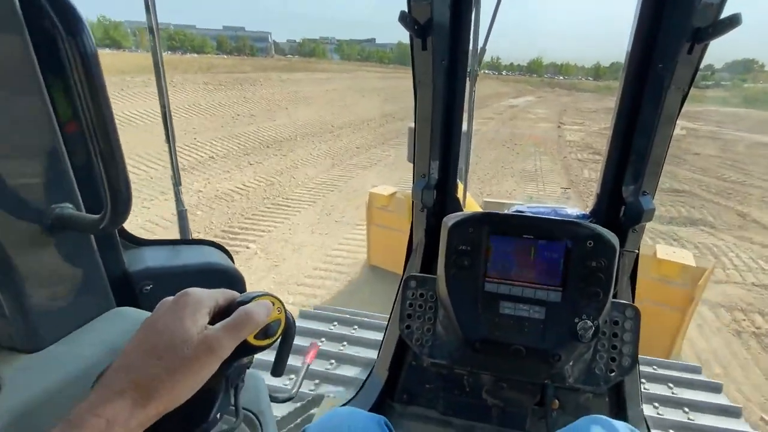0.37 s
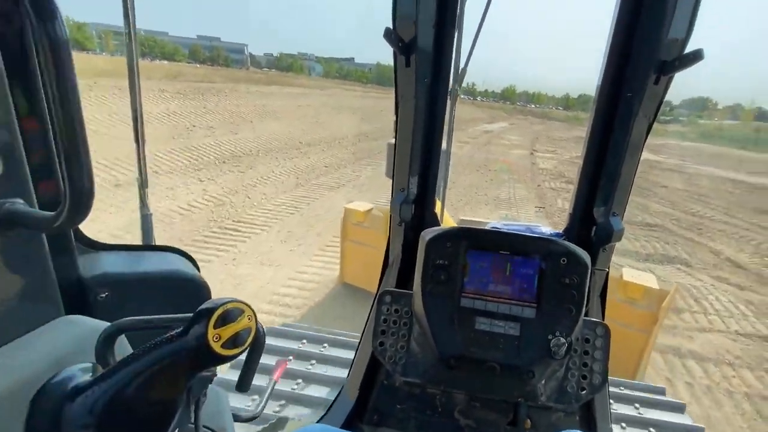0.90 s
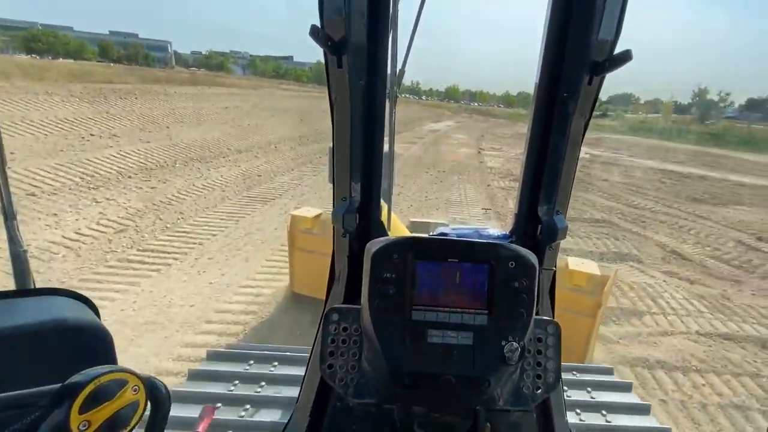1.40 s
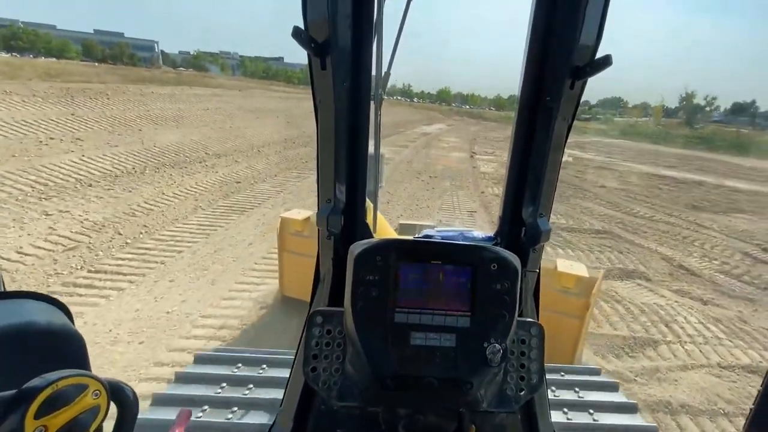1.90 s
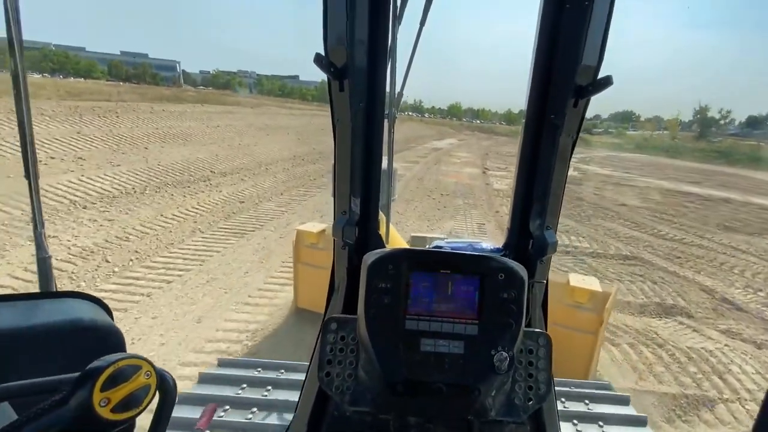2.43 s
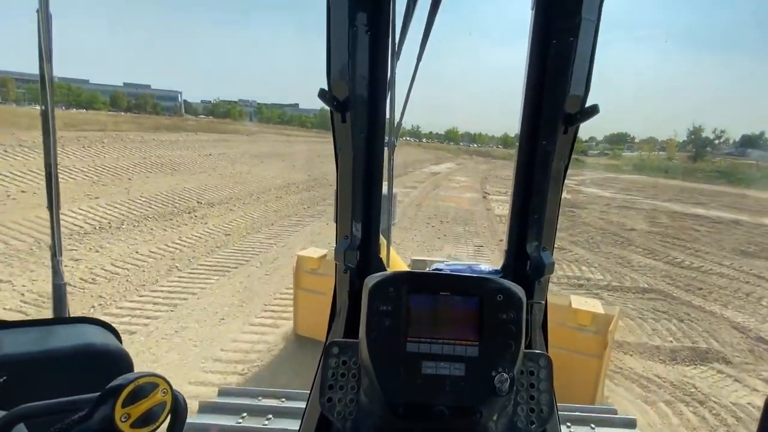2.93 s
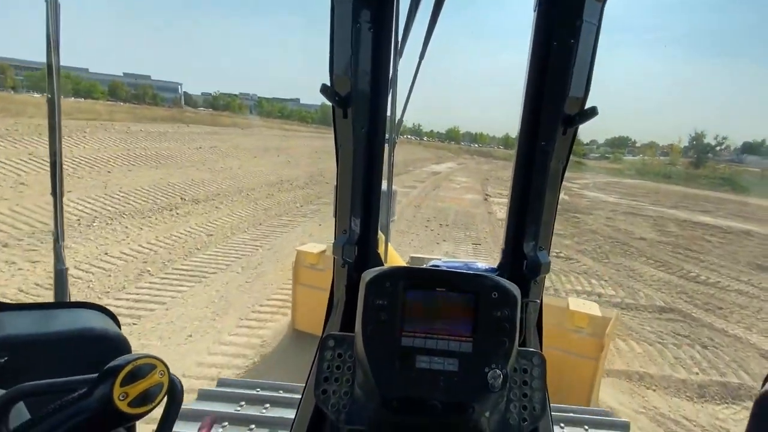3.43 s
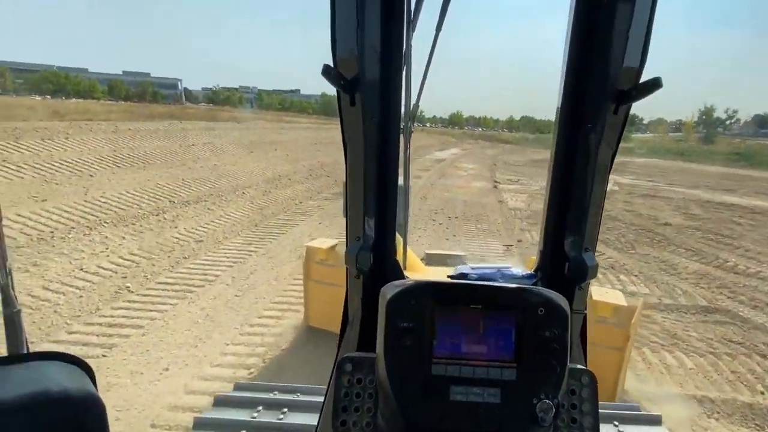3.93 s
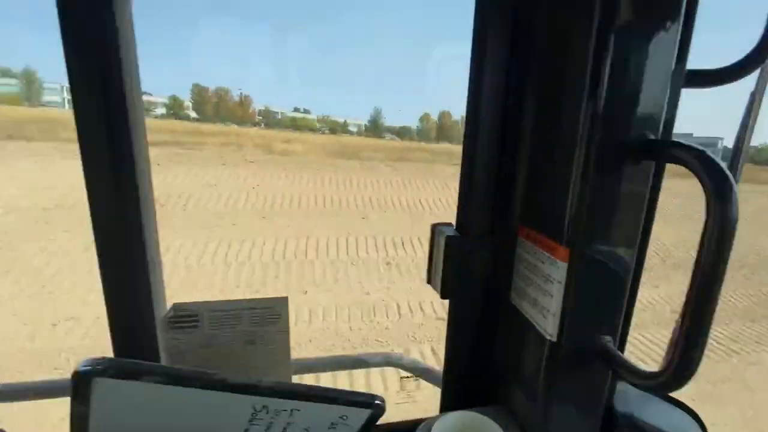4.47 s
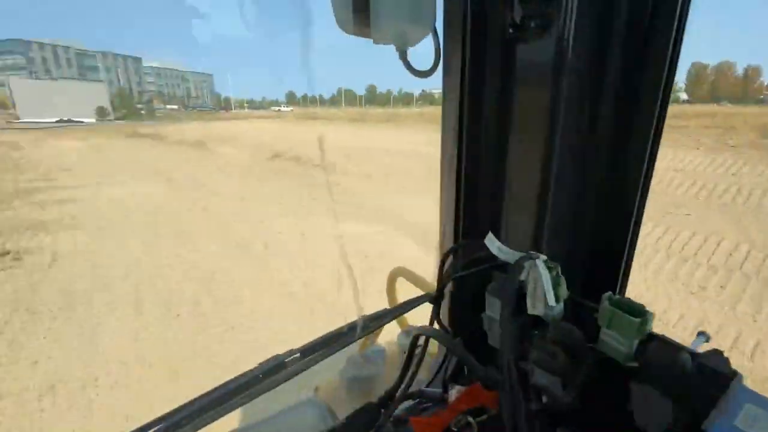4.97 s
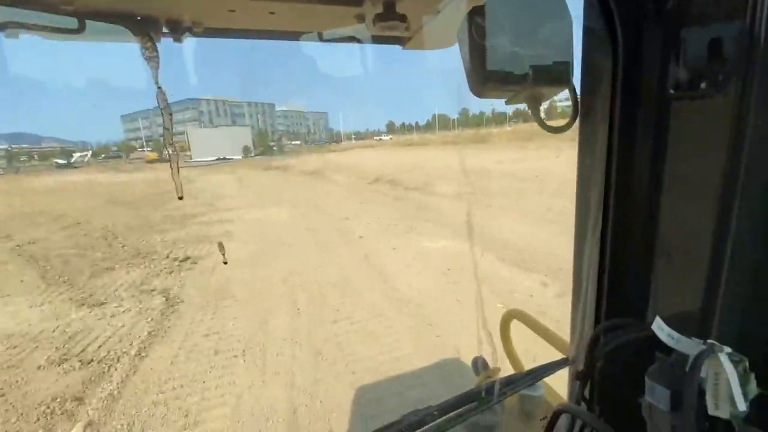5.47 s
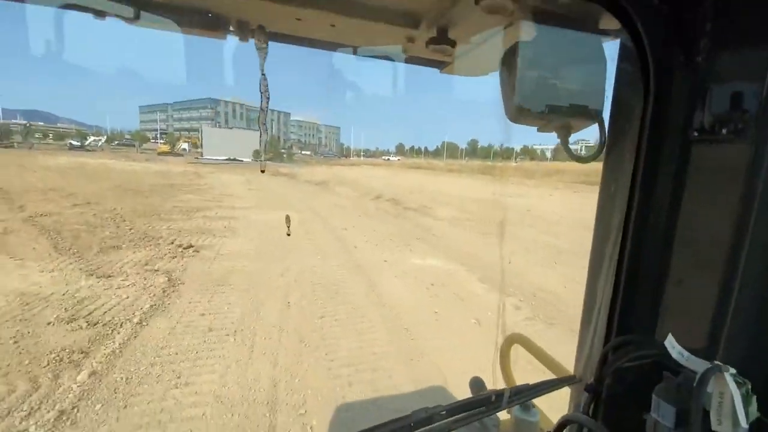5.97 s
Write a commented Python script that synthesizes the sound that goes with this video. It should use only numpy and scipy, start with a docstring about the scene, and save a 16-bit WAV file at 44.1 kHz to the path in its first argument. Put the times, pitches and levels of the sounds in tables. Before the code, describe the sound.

Close stereo sound at the operator's head inside a closed bulldozer cab. A diesel engine drones low under a broad muffled roar, with wavering pump whine and deep irregular booms. Tracks tick and clatter lightly. Around four seconds a cluster of knocks and a sharp metallic snap arrive as the head turns to the rear window; then the roar grows louder and boomier.

```python
"""Riding in a bulldozer cab

Inside the closed cab of a diesel bulldozer on its tracks, heard by two ports on the driver's head.
Engine and pump tones are wavering sines in a roar of shaped noise; the deep booms of the shaken cab are
resonating noise that swells and fades. Clatter and knocks are noise bursts, a loose fitting snaps, a turbo
whistles faintly. Late on the head turns round to the rear window, where the booms add up."""
import sys
import numpy as np
from scipy import signal
from scipy.fft import rfft, irfft, next_fast_len
from scipy.io import wavfile
from scipy.ndimage import uniform_filter1d

SR = 44100
rng = np.random.default_rng(int(sys.argv[2]) if len(sys.argv) > 2 else 0)


def transcribe(signal):
    """Save signal, clipped to [-1, 1], as a 16-bit WAV file at the path in sys.argv[1]."""
    frames = np.atleast_2d(signal).T
    limited = np.clip(frames, -1, 1)
    pcm = np.round(limited * 32767).astype(np.int16)
    wavfile.write(sys.argv[1], SR, pcm)


def voltage_ratio(decibels):
    """Convert decibels (scalar or array-like) to amplitude ratios, 20 dB per decade."""
    exponent = np.asarray(decibels, float) / 20
    return 10 ** exponent


N = 269406  # length in samples
HOP, T = 512, np.arange(N) / SR  # roar step in samples, time in s

# Where the head looks: t/s, turn (0 ahead, 1 behind)
HEAD_TURN = [(0, 0.021), (4.0, 0.026), (4.4, 0.7), (4.8, 0.93), (6.11, 1)]
# How loud the working engine is heard: t/s, roar level/dB
ENGINE_LOAD = [(0, -34.5), (0.8, -33), (1.4, -32.5), (2.2, -31.5), (3.6, -31), (4.2, -30.5), (4.5, -29),
               (5.35, -28), (5.9, -28), (6.11, -29)]
# Colour of the roar facing ahead, then behind: f/Hz, relative level/dB
ROAR_AHEAD = [(30, -4), (60, -12), (100, -10), (170, -17.5), (230, -17.5), (380, -20), (650, -28.5),
              (1000, -26.5), (1150, -33.5), (1400, -34), (2800, -38), (3500, -45), (7000, -53),
              (10000, -62.5), (14300, -64.5), (14700, -93)]
ROAR_BEHIND = [(30, -18), (58, -8), (95, 4), (160, -6.5), (260, -15.5), (400, -15), (540, -16),
               (750, -15.5), (1150, -28), (1400, -26), (2900, -34), (3600, -39), (7000, -47.5),
               (10000, -56), (14300, -59), (14700, -82)]
# Left-right balance of the roar facing ahead, then behind: f/Hz, left over right level/dB
BALANCE_AHEAD = [(60, 3.5), (180, -3), (550, 7), (1650, -0.5), (4970, 3), (15000, -3.5)]
BALANCE_BEHIND = [(60, -4), (180, 1.5), (550, 7), (1650, -0.5), (4970, 4), (15000, -3)]
# Likeness of the roar left and right, ahead then behind: f/Hz, likeness (kept within -1 to 1)
LIKENESS_AHEAD = [(45, 1), (75, 0.75), (150, 0.03), (220, 0.89), (350, 0.65), (420, 0.44), (560, -0.88),
                  (700, -1), (850, -0.23), (1550, -0.38), (2300, -0.099)]
LIKENESS_BEHIND = [(60, 0.72), (170, 0.99), (260, -0.55), (400, 0.26), (650, -0.64), (850, -0.66),
                   (1000, -1.16), (1150, -0.12), (1600, -0.46), (2300, -0.037)]
# Panels and glass that the roar rings: f/Hz, width/Hz, boost ahead/dB, boost behind/dB
PANELS = [(310, 81, 3, 7), (600, 18, 3, 3.5), (730, 82, 1, -7), (1075, 11, -8, 4.5), (1255, 21, 9, 6),
          (1400, 53, 7.5, 3.5), (1907, 88, 4.5, 4), (2220, 140, 2.5, 0), (2700, 51, 2.5, -1.5),
          (3360, 35, -3, -4), (4080, 390, 2, 0.5), (5000, 630, 2, 0.5)]
# Bands of the roar that rise or dip for a while:
# f/Hz, width/Hz, start t/s, end t/s, change/dB (sign flips if the start is after the end)
ROAR_SWELLS = [(295, 140, 4.5, 5.15, -7), (610, 230, 4.5, 5.4, 4), (515, 180, 5.5, 6.3, 2.5),
               (1700, 820, 4.5, 5.2, -2), (945, 110, 0, 1.15, -3.5), (1500, 900, 5.5, 4, 0.5),
               (247, 92, 0.5, 1.2, 1), (1400, 520, 1, 3.1, 1.5), (2580, 900, 3.5, 7.1, 1),
               (1045, 230, 5, 7.2, 4.5), (620, 120, 3.5, 4.4, 3), (170, 50, 4.5, 5.8, 3)]
# Turbo whistle: t/s, f/Hz, level/dB
TURBO_WHISTLE = [(0, 14000, -76), (1.0, 13700, -81), (1.3, 13950, -67), (1.9, 14250, -66),
                 (2.7, 14000, -68), (3.5, 13970, -63), (4.0, 14100, -69), (4.9, 14300, -67),
                 (5.4, 13950, -80), (6.11, 13850, -75)]
# Colour of the clatter of links and rollers: f/Hz, relative level/dB
CLATTER_COLOUR = [(600, -9), (1500, 14.5), (2900, 2), (3600, -1), (7000, -4), (12000, -35), (16000, -40)]
# Knocks of track links and loose gear:
# t/s, relative level/dB, ring f/Hz, brightness/dB per octave, left over right level/dB
KNOCKS = [(0.399, -47.5, 5700, -7, 4), (0.569, -44, 4500, -7, 2), (0.5745, -49, 11300, -3, 0),
          (1.1, -56.5, 1300, -16, 6), (1.1423, -51, 10600, 2, 0), (1.2318, -46, 4030, -10, 1),
          (1.942, -50, 2410, -10, 4), (2.1603, -52, 2780, -9, 7), (2.29, -58, 2330, -6, 1.5),
          (2.45, -46, 4360, -9, 0), (2.78, -48, 1100, -13, 4), (3.121, -56, 1400, -14.5, 14),
          (3.276, -48, 4400, -9, 8), (3.5586, -46, 9200, -4, -3), (3.5878, -41, 7500, -6, 0),
          (3.7678, -48, 2700, -16.5, 5), (3.905, -43, 7200, -9, 1), (3.911, -39.5, 4200, -11, 1),
          (3.9723, -42.5, 4900, -13, 6), (3.973, -42, 3100, -13.5, 8), (4.095, -46, 6740, -7, -1),
          (4.325, -45, 5500, -4, 1), (4.335, -44, 9000, -3, 1), (4.33, -44, 15000, 14, -3),
          (4.346, -39, 14800, 9, -2), (4.344, -42, 11500, 0, 0), (4.346, -40, 1700, -13, 0),
          (4.343, -36.5, 4800, -6, 5), (4.35, -39.5, 2900, -9, 0), (4.6, -47, 1300, -11, -1),
          (4.535, -39, 14800, 10, 0), (4.534, -38.5, 8650, -3, -1), (5.08, -46.5, 2520, -17, 4),
          (5.2012, -43, 3090, -5, 0), (5.37, -46, 5000, -9, -6), (5.382, -47, 6500, 0, 0),
          (5.398, -44, 2200, -9, 11), (5.523, -42, 3060, -18, 0), (6.089, -44, 7000, -10, 3)]
# What every knock rings in the cab frame: f/Hz, width/Hz, boost/dB
FRAME = [(1400, 290, 3.5), (2840, 220, 9), (3060, 150, 6.5), (4040, 210, 7.5), (5160, 1300, 9),
         (7100, 390, 6), (8960, 370, 7)]
# A loose fitting snaps and bounces: t/s, level/dB, pitch ratio
SNAPS = [(4.3435, -30, 0.89), (4.3478, -33, 0.85), (4.5375, -32, 0.77), (5.3873, -24.5, 0.93),
         (5.3908, -28, 0.99)]
# Rings of that fitting: f/Hz, relative level/dB, time to fall by 60 dB/s
FITTING_RINGS = [(1350, 1, 0.013), (1890, -5, 0.011), (3600, 1, 0.0088), (7450, -2, 0.0046)]
# The five boom modes of the cab: f/Hz, width/Hz, left-right likeness ahead, likeness behind,
# left over right level/dB, evenness (0-1)
CAB_MODES = [(43.9, 21, 0.96, 0.96, 1.5, 0.78), (89.6, 12.8, 0.71, 0.99, 0.5, 0.95),
             (138.86, 20.1, 0.11, 0.99, 1, 0.24), (215.2, 41, 0.92, 0.91, 3, 0.98),
             (576, 370, -0.097, 0.46, 0, 0)]
# Each mode between its swells: level ahead/dB, level behind/dB, waver/dB,
# share of the head turn that brings the change (0-1)
RESTING = [(-28.5, -25, 1.4, 0.8), (-35, -28, 4, 1), (-33.5, -28, 1.5, 0.5), (-38.5, -43.5, 2, 1),
           (-42.5, -41, 1.2, 0.5)]
# Loudest swells of the booms: t/s, f/Hz (picks the mode near it), added peak level/dB,
# time to fall by 39 dB/s (at least 0.02)
BOOM_SWELLS = [(0.143, 214, -27.5, 0.039), (0.452, 44, -18, 0.057), (0.538, 137, -21.5, 0.028),
               (1.116, 137, -26.5, 0.13), (1.148, 214, -29.5, 0.071), (1.15, 44, -21.5, 0.18),
               (0.253, 137, -28, 0.11), (3.55, 137, -28.5, 0.12), (1.308, 214, -28, 0.056),
               (1.452, 214, -32, 0.06), (1.49, 44, -19, 0.054), (1.567, 137, -28, 0.266),
               (1.834, 44, -17.5, 0.059), (1.94, 137, -25, 0.14), (2.05, 89, -22, 0.078),
               (2.183, 137, -24.5, 0.042), (2.226, 44, -19, 0.068), (2.268, 137, -20.5, 0.025),
               (2.375, 89, -23.5, 0.082), (2.563, 89, -22, 0.04), (2.832, 44, -16.5, 0.06),
               (2.893, 89, -34, 0.037), (2.97, 89, -21.5, 0.071), (3.096, 89, -22.5, 0.065),
               (3.263, 137, -22.5, 0.05), (3.334, 44, -18, 0.1), (3.505, 89, -19.5, 0.043),
               (3.51, 214, -27.5, 0.048), (3.606, 89, -21, 0.041), (3.7, 44, -22.5, 0.47),
               (3.994, 44, -18.5, 0.19), (4.135, 214, -32, 0.078), (4.408, 137, -28, 0.038),
               (4.496, 137, -21.5, 0.15), (4.573, 44, -19.5, 0.17), (4.62, 214, -32, 0.4),
               (4.846, 137, -17, 0.17), (4.96, 89, -19, 0.063), (4.976, 137, -22, 0.07),
               (4.98, 214, -32, 0.069), (5.081, 137, -14, 0.087), (5.163, 89, -16.5, 0.099),
               (5.31, 44, -21, 0.08), (5.429, 89, -15.5, 0.069), (5.464, 214, -33.5, 0.23),
               (5.659, 137, -11, 0.018), (5.725, 214, -32, 0.083), (5.78, 44, -19.5, 0.26),
               (5.55, 137, -24.5, 0.1), (5.946, 89, -14.5, 0.038), (6.045, 137, -23.5, 0.13),
               (5.935, 214, -34, 0.13)]
# Engine speed: t/s, crank turns per second/Hz
CRANK = [(0, 34.4), (1.0, 34.22), (2.0, 34.54), (4.0, 34.48), (5.0, 34.64), (6.11, 34.5)]
# Firing, pump and gear tones: multiple of the crank speed
MULTIPLES = [2, 4, 7, 9, 12, 14, 15, 24, 27]
# Each of those tones: left and right level ahead/dB, left and right level behind/dB,
# left lead ahead/rad, left lead behind/rad
TONES_HEARD = [(-26, -28.5, -24, -25, 0.05, -0.15), (-40.5, -45.5, -34, -32, -2.26, 0),
               (-43, -61, -47, -45, 0.74, 0), (-54, -44, -62, -65, 0.51, 0),
               (-37, -53, -35, -38, 2.6, -0.3), (-48, -47, -47, -46, -1.4, 0.8),
               (-52, -56, -37.5, -48, -0.3, -0.3), (-59, -46.5, -47, -48, -0.8, -2.8),
               (-63, -63, -59, -56, -1.3, -1.6)]
# A tone rises or dips for a while, or its left lead changes:
# crank multiple, start t/s, end t/s, left change/dB, right change/dB, change of left lead/rad
SHIFTS = [(2, 1.75, 2.5, -3, -4, 0), (2, 1.2, 1.75, 2, 2, 0), (2, 3.7, 4.45, -7, -6, 0),
          (24, 0.25, 0.45, 5, 0, 0), (24, 0.72, 0.95, 5, 0, 0), (15, 4.95, 5.1, -4, -3, 0),
          (24, 1.6, 2.2, -1.5, 0, 0), (15, 4.2, 4.75, -6, 0, 0), (15, 5.52, 5.8, 3.5, 2, 0),
          (15, 5.82, 6.3, -6, -3, 0), (24, 4.5, 4.72, 2, -5, 0), (12, 0.25, 1.5, 1.5, 0, -2),
          (12, 1.5, 2.7, -2.5, 8, 0), (12, 2.7, 3.5, 1, 11, 0), (12, 3.3, 3.75, 1.5, 3, 0),
          (12, 3.75, 4.3, -3.5, -3, 0), (12, 4.4, 4.8, 0, 2, 0), (12, 5.85, 6.3, -6, -5, 0),
          (14, 2.1, 3.75, 0, 5, 0), (14, 2.9, 3.75, 8, 5.5, 0), (15, 4.72, 5.25, 2, 0, 0),
          (15, 5.25, 5.5, -3, -3, 0), (24, 1.6, 4.45, 11.5, 1, 0), (24, 2.25, 3.75, 3, -1, 0),
          (24, 0.95, 1.55, 0, -12, 0), (24, 3.95, 4.5, 1, 4, -0.7), (2, 5.2, 5.35, 2.5, 2.5, 0),
          (2, 5.55, 5.9, 1.5, 1.5, 0), (27, 1.25, 2.3, 12, 7, 0), (27, 3.75, 4.35, 17, 8, 0)]
# Likeness traded between the close ports: f/Hz, likeness (-1 out of step, 1 alike)
PORTS = [(40, 0.25), (62, -0.14), (4500, 0.09), (5700, -0.031), (7000, 0.16), (8500, -0.15), (9500, -0.17),
         (10250, 0.28), (11800, 0.77), (12500, -0.62), (14300, -0.6), (14700, 0.26)]

# Softness of each change made by held(), in s, and phase waver of each engine tone, in rad
SHIFT_EDGE_S, WAVER_RAD = 0.1, 0.55
# Treble against the roar, its lifts facing the side and rear windows, flicker of the roar
TREBLE_DB, SIDE_LIFT_DB, REAR_LIFT_DB, FLICKER_DB = -22.5, 1.5, 0.5, 1.11
# Unevenness of the roar: broad patches and narrow ridges
PATCHES_DB, RIDGES_DB = 1.3, 2.8
# Below WORKING_DB a light load is duller: dB per octave for each missing dB, over one octave from BODY_HZ
DULLING, BODY_HZ, WORKING_DB = 0.41, 400, -34
# Track shoes passing the sprocket: rate, time of one landing, sharpness of the throb,
# its small effect on the roar (dB per octave above BODY_HZ), its depth in the clatter rate (share)
SHOES_PER_S, SHOE_S, SHOE_SHARP, SHOE_DB, SHOE_SHARE = 5.8, 3, 1.5, -0.03, 0.55
FLUTTER_SHARE = 0.24  # a faint flutter of the clatter at three times the crank speed
# Scrape before a knock: growth time in ring cycles, share of the knock level
SCRAPE_CYCLES, SCRAPE_SHARE = 18, 0.68
# Knock: 60 dB fall in s (shorter for parts ringing above SMALL_HZ), ring level and width setting
KNOCK_T60, SMALL_HZ, RING_DB, RING_WIDTH_HZ = 0.14, 7000, 5.5, 190
SNAP_RISE_S = 0.00023


def evened(x):
    """Scales a signal to rms 1."""
    return x / np.sqrt(np.mean(np.abs(x) ** 2) + 1e-20)


def curve(rows, t=T):
    """Reads the columns of a table at times t."""
    s, *columns = np.transpose(rows)
    return [np.interp(t, s, c) for c in columns]


def read(points, hz):
    """Reads a spectrum along a log-frequency axis."""
    f, value = np.transpose(points)
    return np.interp(np.log(hz + 1), np.log(f + 1), value)


def drift(top_hz, t=T, span=20):
    """Slow random wandering of rms 1: sines from top_hz / span up to top_hz."""
    coarse = np.arange(0, t[-1] + .02, .01)
    waves = 0
    for f in np.geomspace(top_hz / span, top_hz, num=20):
        waves = waves + np.sin(2 * np.pi * (f * coarse + rng.random())) / np.sqrt(f)
    return np.interp(t, coarse, evened(waves))


def resonate(x, hz, width):
    """A resonance of gain 1 applied twice, for steep skirts."""
    pole = np.exp((2j * np.pi * hz - np.pi * width) / SR)
    once = signal.lfilter([1 - abs(pole)], [1, -pole], x)
    return 2 * signal.lfilter([1 - abs(pole)], [1, -pole], once).real


def pair(shape, same):
    """Two complex noises that are alike by the share same."""
    a, b, c, d = rng.standard_normal((4, *shape))
    same = np.clip(same, -1, 1)
    first, other = a + 1j * b, c + 1j * d
    return np.array([first, same * first + np.sqrt(1 - same ** 2) * other])


def held(start, end, t=T):
    """Rises to 1 at start and falls back at end, with soft edges."""
    return (np.tanh((t - start) / SHIFT_EDGE_S) - np.tanh((t - end) / SHIFT_EDGE_S)) / 2


def bump(hz, centre, width, power=2):
    """A peak of height 1 that falls to half at half the width on either side."""
    return 1 / (1 + ((hz - centre) / (width / 2)) ** power)


def treble(roar_db, turn):
    """Treble level: it follows the roar and leaks in through the glass the head faces."""
    side = 4 * np.clip(turn * (1 - turn), 0, 1)
    return roar_db + TREBLE_DB + SIDE_LIFT_DB * side + REAR_LIFT_DB * turn


def shoes(t=T):
    """Throb of the landing track shoes, mean 0 and rms 1, wandering a little in time."""
    angle = 2 * np.pi * (SHOES_PER_S * (t - SHOE_S) + 0.083 * drift(1.3, t))
    throb = np.exp(SHOE_SHARP * np.cos(angle))
    return evened(throb - throb.mean())


def roar():
    """Engine, fan and ground noise through the cab walls; colour and width change as the head turns."""
    t, hz = np.arange(N // HOP + 5) * HOP / SR, np.fft.rfftfreq(4 * HOP, 1 / SR)
    rows = hz[:, None]
    turn, = curve(HEAD_TURN, t)
    roar_db, = curve(ENGINE_LOAD, t)

    def blend(ahead, behind):
        """Mixes two spectra by how far the head has turned."""
        return read(ahead, hz)[:, None] * (1 - turn) + read(behind, hz)[:, None] * turn

    patches = uniform_filter1d(rng.standard_normal((len(hz), len(t))), 10, 0)
    patches = evened(uniform_filter1d(patches, 8, 1))
    # the many small cab modes: narrow ridges that shift slowly
    ridges = uniform_filter1d(rng.standard_normal((2, len(hz), len(t))), 2, 1)
    ridges = evened(uniform_filter1d(ridges, 45, 2))
    noise = pair(patches.shape, blend(LIKENESS_AHEAD, LIKENESS_BEHIND))
    left_db = blend(BALANCE_AHEAD, BALANCE_BEHIND) / 2

    rings_db = sum((a + (b - a) * turn) * bump(rows, f, width) for f, width, a, b in PANELS)
    colour = voltage_ratio(blend(ROAR_AHEAD, ROAR_BEHIND) + rings_db)
    band = (hz > 170) & (hz < 2500)  # the level is set in this band
    colour /= np.sqrt((colour[band] ** 2).sum(0))

    octaves_high = np.clip(np.log2((rows + 1) / 2500), 0, 1.7)
    lift_db = treble(roar_db, turn) - roar_db
    change_db = octaves_high * (lift_db - np.mean(lift_db))
    octaves_upper = np.clip(np.log2((rows + 1) / BODY_HZ), 0, 1)
    change_db += octaves_upper * (DULLING * np.minimum(roar_db - WORKING_DB, 0) + SHOE_DB * shoes(t))
    for swell_hz, width, start, end, swell_db in ROAR_SWELLS:
        change_db += swell_db * held(start, end, t) * bump(rows, swell_hz, width, 4)

    uneven_db = PATCHES_DB * patches + RIDGES_DB * ridges
    flicker_db = FLICKER_DB * drift(25, t, span=5)
    noise *= colour * voltage_ratio(np.array([left_db, -left_db]) + uneven_db + roar_db + flicker_db + change_db)
    return voltage_ratio(1.0) * signal.istft(noise, nperseg=4 * HOP, noverlap=3 * HOP)[1][:, :N]


def turbo():
    """A faint whistle, blurred by a shaking pitch and out of step at the two ports."""
    hz, level_db = curve(TURBO_WHISTLE)
    blur_hz = 35 * evened(uniform_filter1d(rng.standard_normal(N), 400))
    angle = 2 * np.pi * np.cumsum(hz + blur_hz + 15 * drift(30)) / SR
    return voltage_ratio(level_db + 2.4 * drift(20)) * np.array([np.cos(angle), np.cos(angle + 1.0)])


def latch():
    """Each snap of the loose fitting rings the same short modes, at its own pitch ratio."""
    t, out = np.arange(1500) / SR, np.zeros(N)
    for s, db, ratio in SNAPS:
        ring = 0
        for hz, mode_db, t60 in FITTING_RINGS:
            ring = ring + voltage_ratio(mode_db - 60 * t / t60) * np.sin(2 * np.pi * hz * ratio * t)
        out[round(s * SR):][:len(t)] += voltage_ratio(db) * ring * (1 - np.exp(-t / SNAP_RISE_S))
    return out * voltage_ratio(np.array([[1.2], [-1.2]]))


def knocks():
    """A burst of tilted noise and a ring of the struck part; a scrape leads in, a faint tail follows."""
    size, lead = 8192, 2048  # samples in all, samples before the contact
    out = np.zeros((2, N + size))
    t, hz = (np.arange(size) - lead) / SR, np.fft.rfftfreq(size, 1 / SR)
    frame_db = sum(gain_db * bump(hz, f, width) for f, width, gain_db in FRAME)
    for s, db, ring_hz, tilt_db, pan_db in KNOCKS:
        common, own = rng.standard_normal(size), rng.standard_normal((2, size))
        thin = 1 / (1 + (0.51 * min(ring_hz, 4500) / (hz + 1)) ** 6)  # small parts give no bass
        tilted = thin * voltage_ratio(tilt_db * np.log2((hz + 1) / 5000))
        struck = voltage_ratio(RING_DB) / (1 + ((hz - ring_hz) / RING_WIDTH_HZ) ** 2)
        colour = (tilted + struck) * voltage_ratio(frame_db) / (1 + (hz / 15800) ** 12)
        burst = irfft(rfft(.5 * common + 2.1 * own) * colour, size)
        treble_size = np.sqrt(np.mean(colour[hz > 3000] ** 2))
        quickness = np.clip(ring_hz / SMALL_HZ, 1, 1.4) ** 2
        fall = voltage_ratio(-60 * t / KNOCK_T60 * quickness) + 0.11 * voltage_ratio(-60 * t / 0.25)
        # deep-ringing parts scrape in more slowly
        scrape = SCRAPE_SHARE * np.exp(np.minimum(t, 0) * ring_hz / SCRAPE_CYCLES)
        shape = np.where(t < 0, scrape, fall)
        at = round(s * SR) - lead
        pan = voltage_ratio(np.array([[pan_db], [-pan_db]]) / 2)
        out[:, at:at + size] += voltage_ratio(db - 8.5) * burst / treble_size * shape * pan
    return out[:, :N]


def clatter():
    """Links and rollers tick at random, most as a shoe lands; each tick is a noise burst, other at each port."""
    size = voltage_ratio(3.1 * np.minimum(rng.exponential(1, N), 3))
    size = size * (rng.random(N) < 40. / SR * (1 + SHOE_SHARE * shoes()))  # about 40 ticks per s
    t = np.arange(3000) / SR
    flutter = 2 * np.pi * 3 * np.cumsum(curve(CRANK)[0]) / SR
    tick_power = voltage_ratio(-120 * t / 0.1) * (1 - np.exp(-t / 0.0011))
    bursts = np.sqrt(np.abs(signal.oaconvolve(size ** 2, tick_power)[:N]))
    noise = rng.standard_normal((2, N)) * bursts * (1 + FLUTTER_SHARE * np.cos(flutter))
    shaped = irfft(rfft(noise) * voltage_ratio(read(CLATTER_COLOUR, np.fft.rfftfreq(N, 1 / SR))), N)
    level = voltage_ratio(treble(curve(ENGINE_LOAD)[0], curve(HEAD_TURN)[0]))
    return level * evened(shaped) * voltage_ratio(np.array([[.8], [-.8]]))


def booms():
    """Shaking, made as noise, rings the modes of the cab; each boom swells and fades."""
    turn, = curve(HEAD_TURN)
    out = np.zeros((2, N))
    for resting, mode in zip(RESTING, CAB_MODES):
        rest_a, rest_b, waver_db, share = resting
        hz, width, ahead, behind, left_db, even = mode
        rest_db = rest_a + (rest_b - rest_a) * np.clip(turn / share, 0, 1)
        power = voltage_ratio(rest_db + waver_db * drift(16)) ** 2
        for s, mode_hz, peak_db, length in BOOM_SWELLS:
            if abs(mode_hz / hz - 1) < .2:
                power += voltage_ratio(2 * peak_db - 78 * np.minimum(((T - s) / max(length, .02)) ** 2, 9))
        ring = resonate(pair((N,), ahead + (behind - ahead) * turn).real, hz, width)
        swing = np.abs(signal.hilbert(ring.mean(0), next_fast_len(N))[:N])
        # smooths the noise's own swing so that the listed swells shape the boom
        smooth = uniform_filter1d(swing, 700) + 0.057 * swing.mean()
        steady = ring / smooth ** np.clip(even, 0, 1)
        pan = voltage_ratio(np.array([[left_db], [-left_db]]) / 2)
        out += np.sqrt(power) * steady / np.std(steady.mean(0)) * pan
    return out


def tones():
    """Near sines on multiples of the crank speed; panels flexing make them waver."""
    speed, = curve(CRANK)
    turn, = curve(HEAD_TURN)
    crank = 2 * np.pi * np.cumsum(speed * (1 + 0.0015 * drift(11.95))) / SR
    out = np.zeros((2, N))
    for multiple, heard in zip(MULTIPLES, TONES_HEARD):
        left_a, right_a, left_b, right_b, lead_a, lead_b = heard
        level_db = np.array([left_a + (left_b - left_a) * turn, right_a + (right_b - right_a) * turn])
        level_db = level_db + 2 * drift(12, span=4)
        lead = lead_a + (lead_b - lead_a) * turn
        for which, start, end, *change_db, swing in SHIFTS:
            if round(which) == multiple:
                level_db += np.outer(change_db, held(start, end))
                lead = lead + swing * held(start, end)
        angle = multiple * crank + 2 * np.pi * rng.random() + WAVER_RAD * drift(8, span=5)
        out += voltage_ratio(level_db) * np.cos([angle, angle - lead])
    return np.sqrt(2) * out  # so that the levels are rms


def scene():
    """Adds all sources as they reach the two ports."""
    return roar() + turbo() + latch() + knocks() + clatter() + booms() + tones()


def low_pass(x):
    """Removes everything above the highest recorded frequency."""
    return signal.sosfilt(signal.butter(12, 16390, fs=SR, output="sos"), x)


def record(dry):
    """The port pair weights the sum and difference of its sides by likeness; then a steep bass cut."""
    same = np.clip(read(PORTS, np.fft.rfftfreq(N, 1 / SR)), -1, 1)
    mid = irfft(rfft(dry[0] + dry[1]) * np.sqrt(1 + same), N) / 2
    side = irfft(rfft(dry[0] - dry[1]) * np.sqrt(1 - same), N) / 2
    bass_cut = signal.butter(9, 36, "high", fs=SR, output="sos")  # ninth order at 36 Hz
    mix = signal.sosfilt(bass_cut, [mid + side, mid - side])
    return low_pass(mix)


dry = scene()
out = record(dry)
transcribe(out)
```